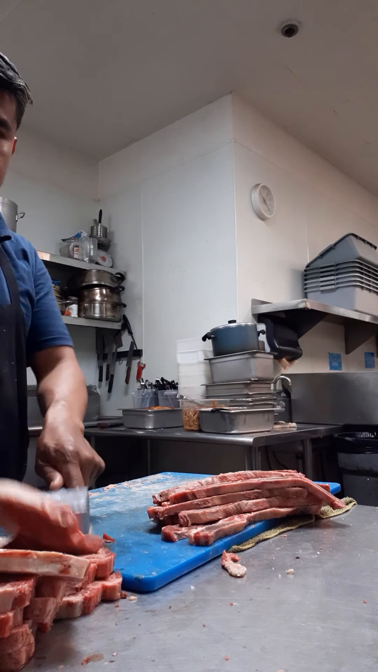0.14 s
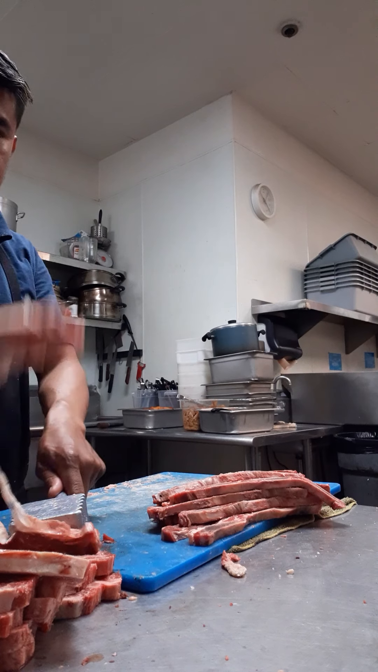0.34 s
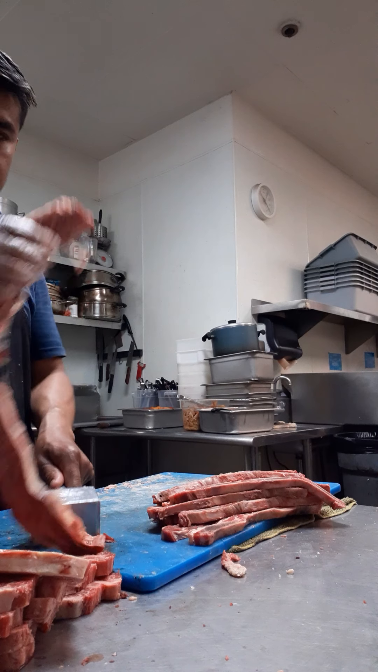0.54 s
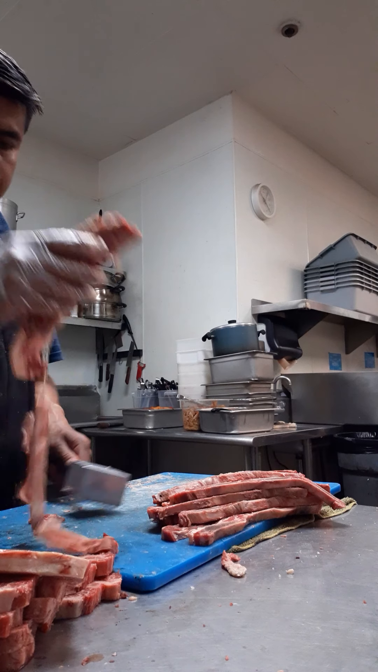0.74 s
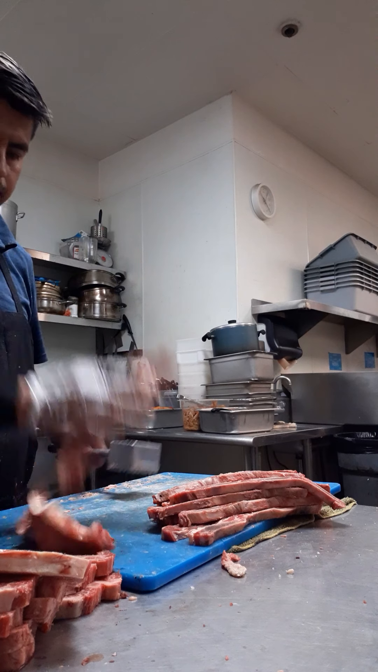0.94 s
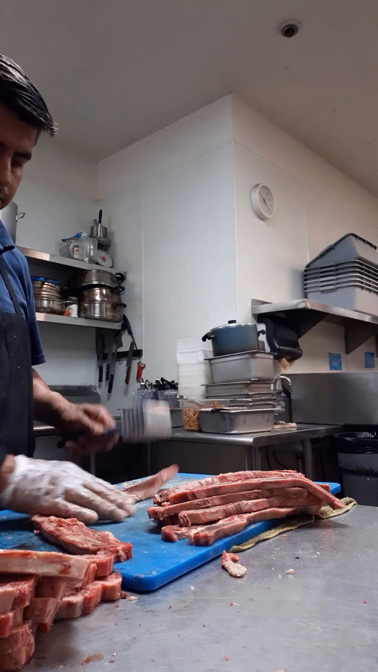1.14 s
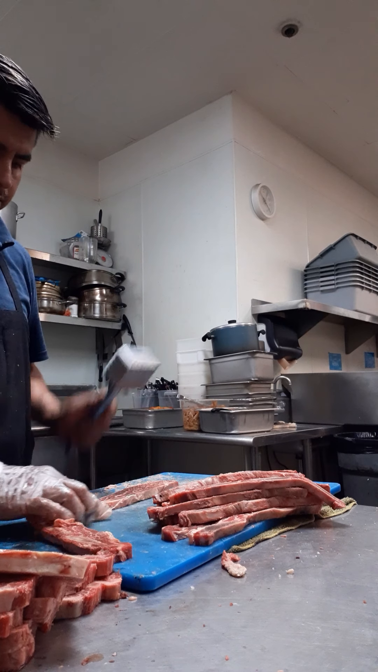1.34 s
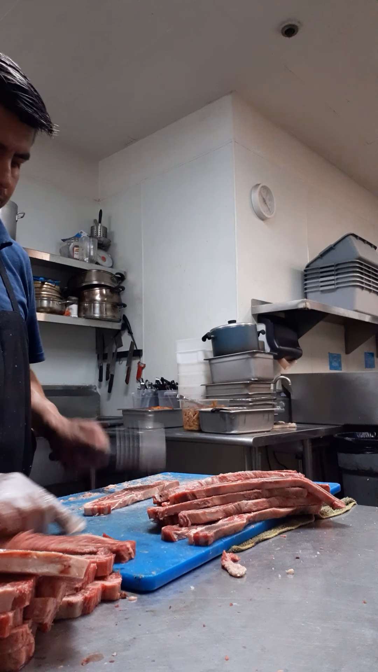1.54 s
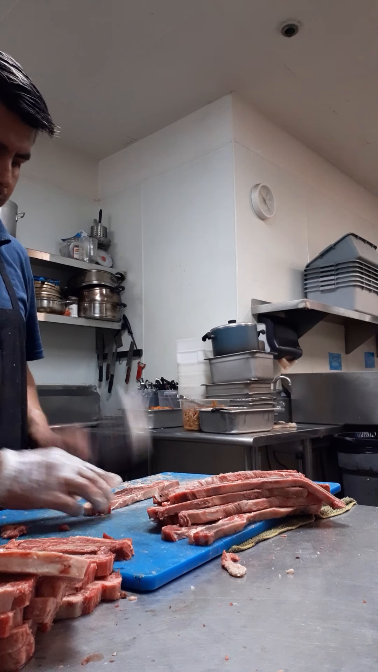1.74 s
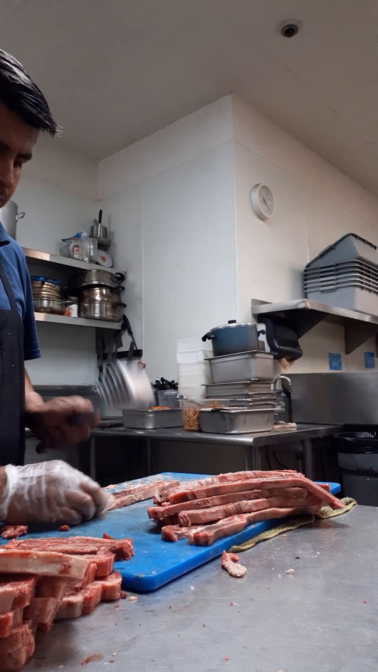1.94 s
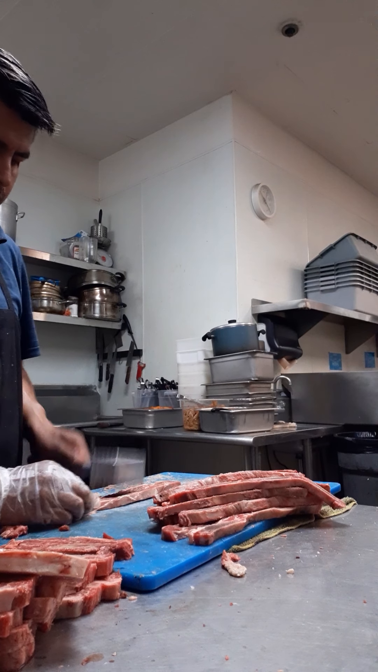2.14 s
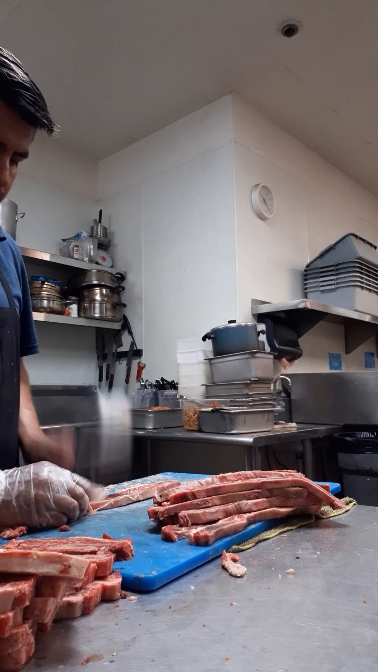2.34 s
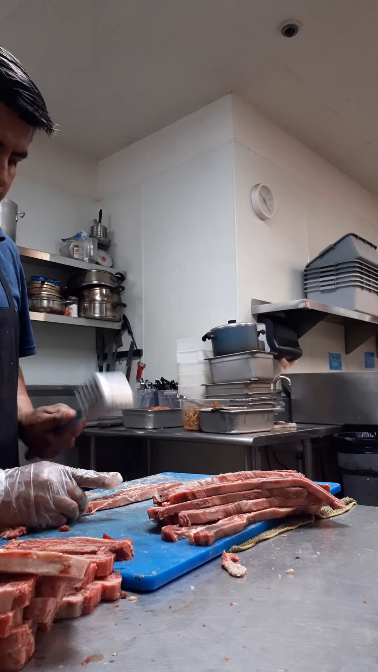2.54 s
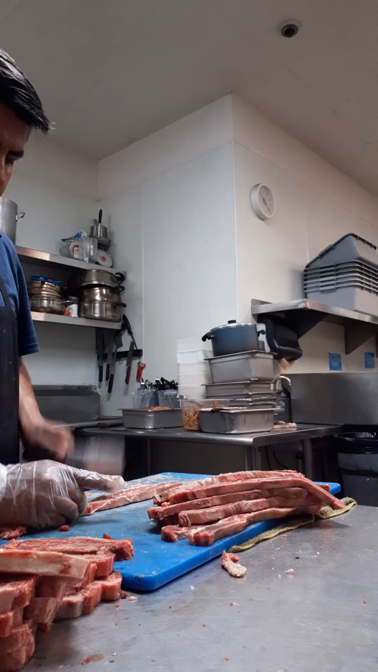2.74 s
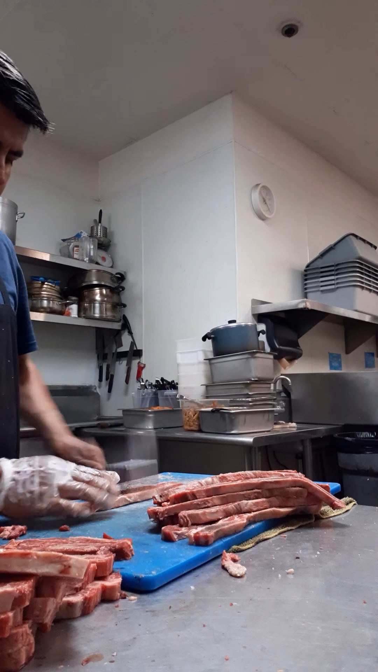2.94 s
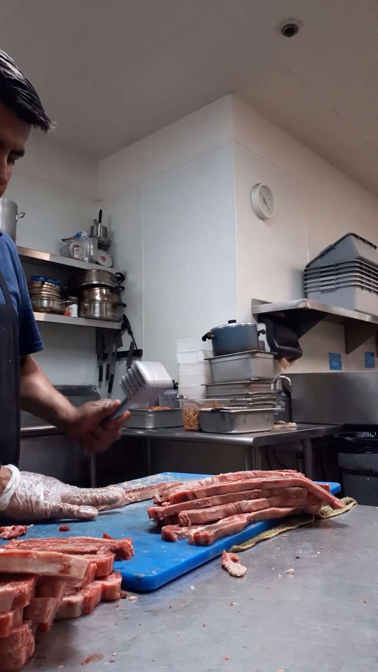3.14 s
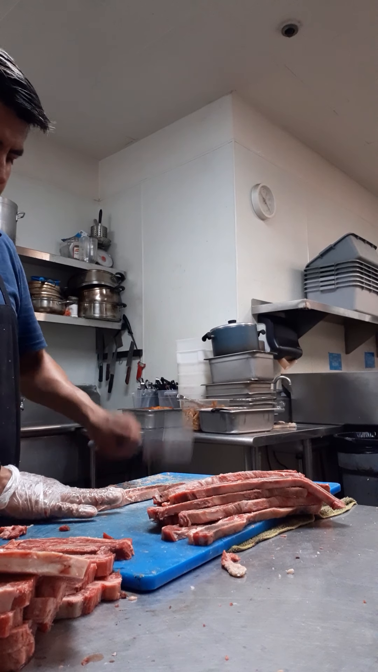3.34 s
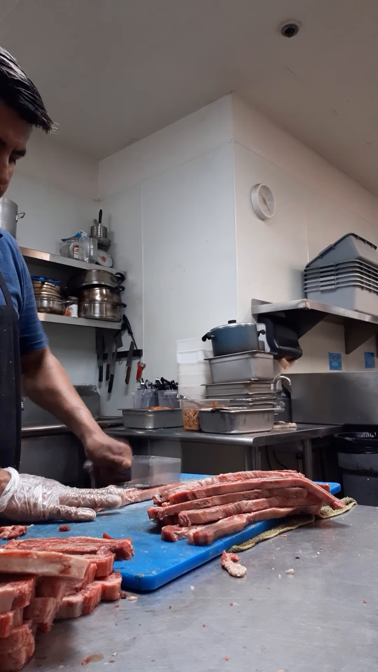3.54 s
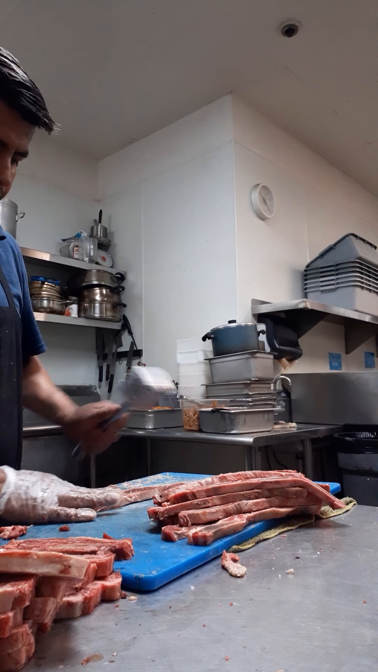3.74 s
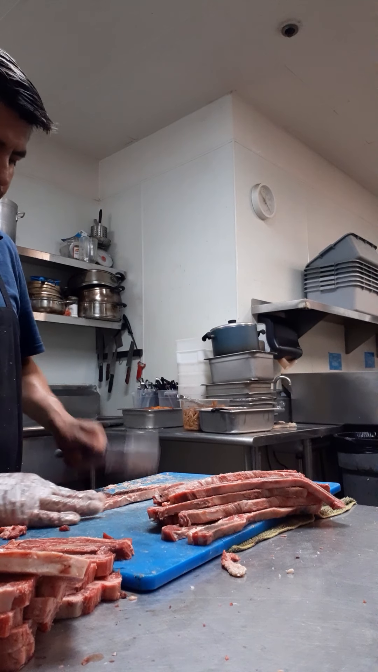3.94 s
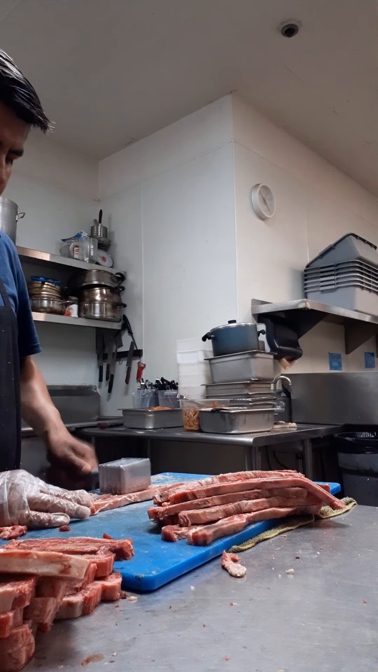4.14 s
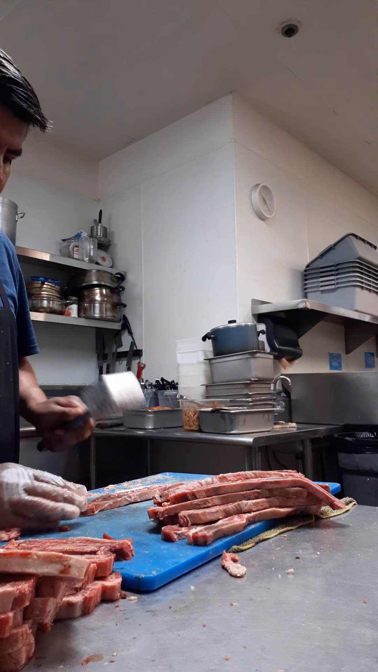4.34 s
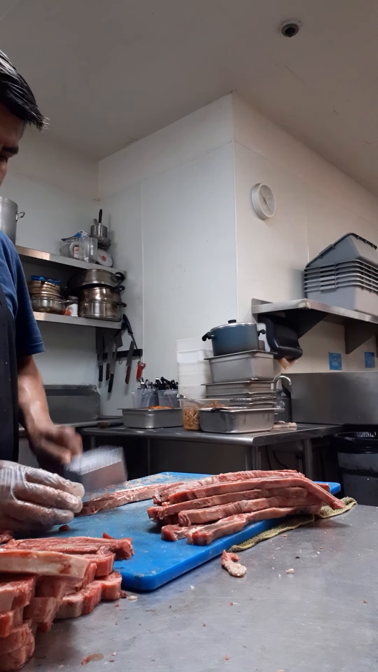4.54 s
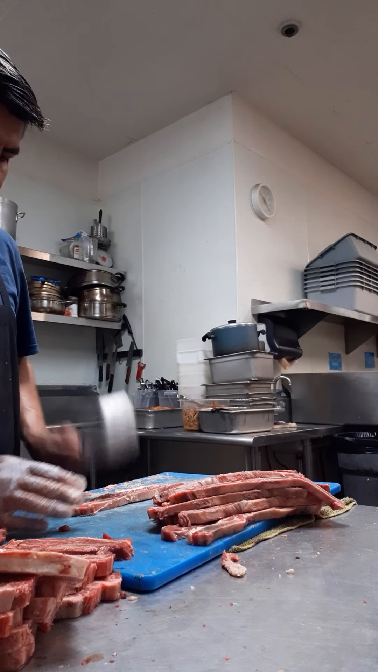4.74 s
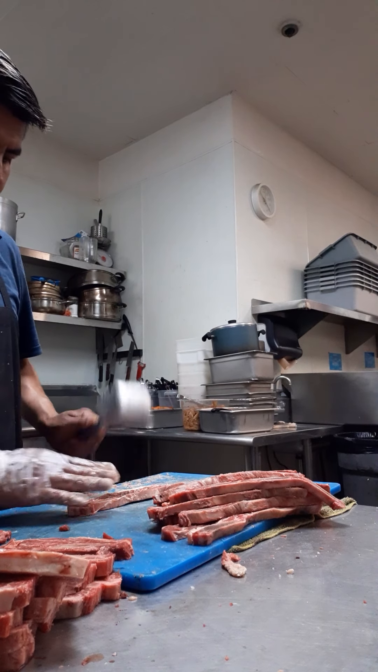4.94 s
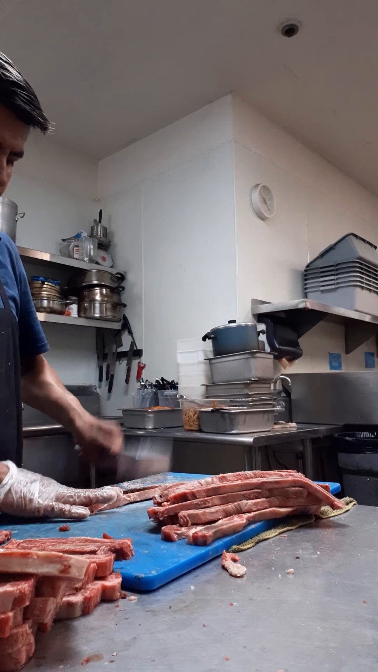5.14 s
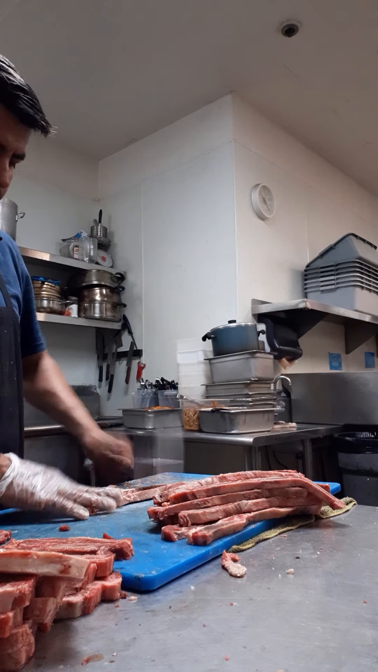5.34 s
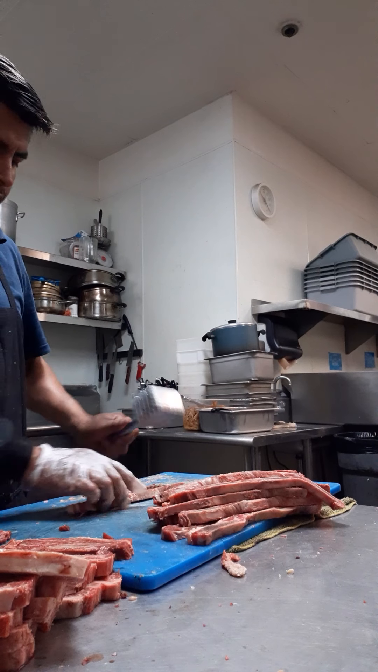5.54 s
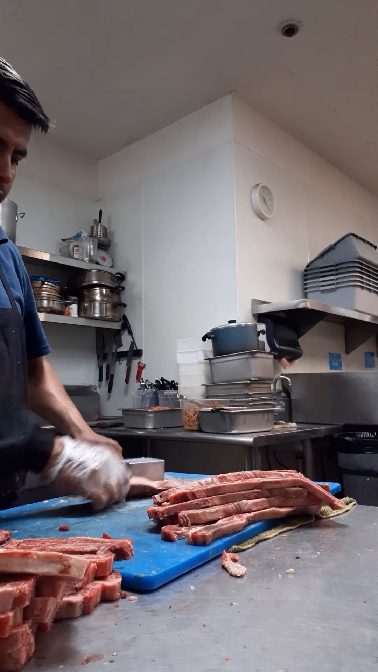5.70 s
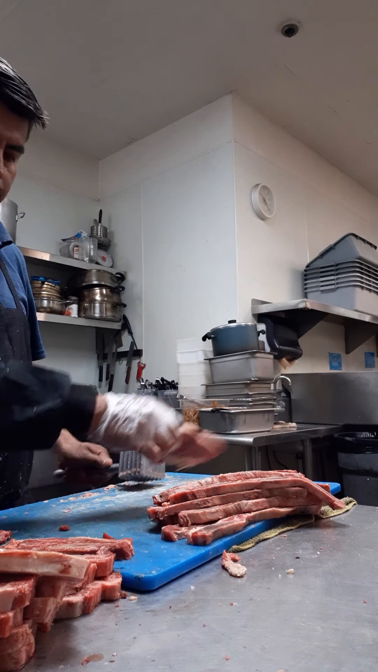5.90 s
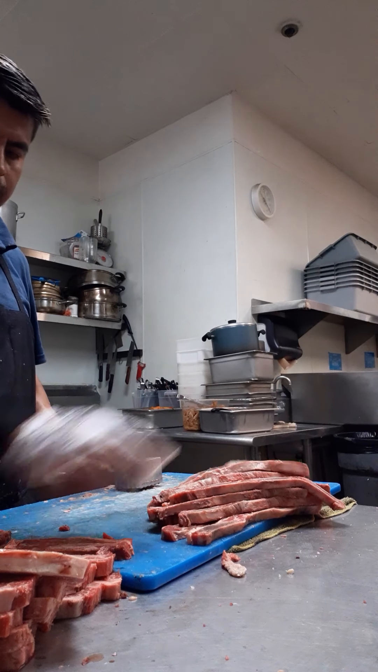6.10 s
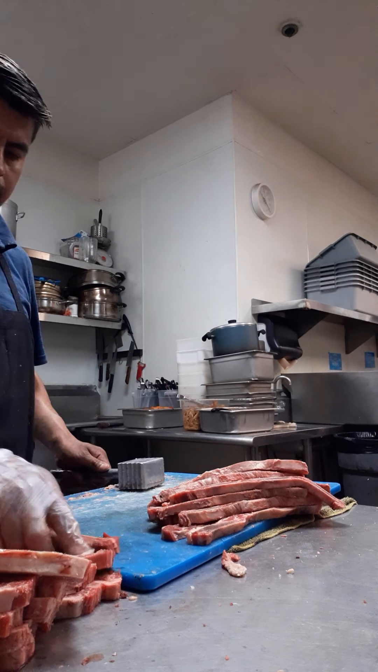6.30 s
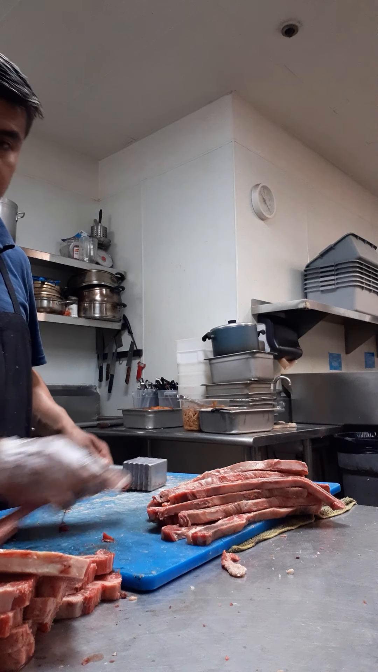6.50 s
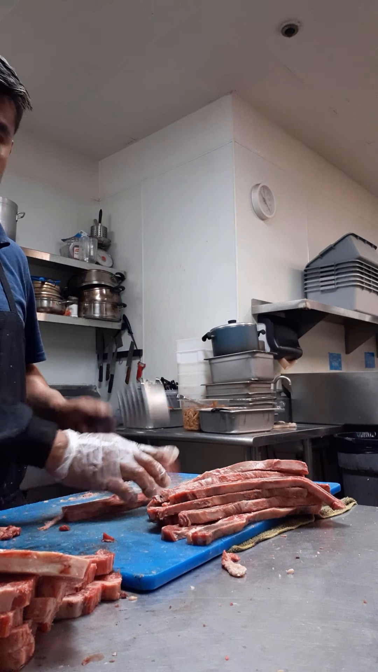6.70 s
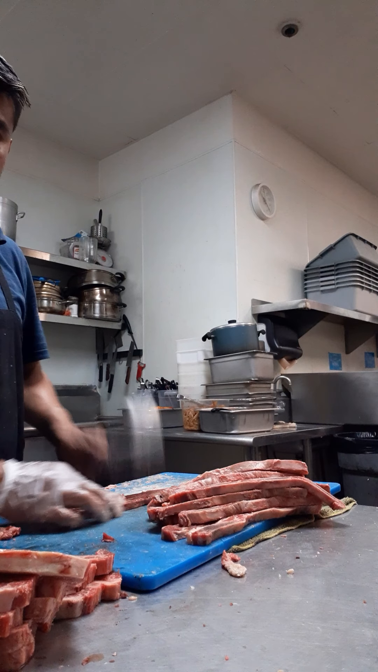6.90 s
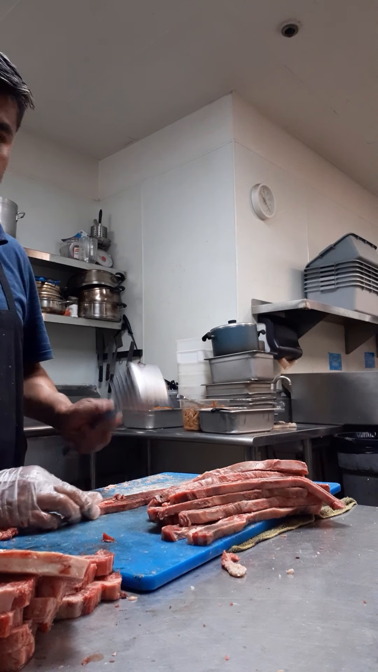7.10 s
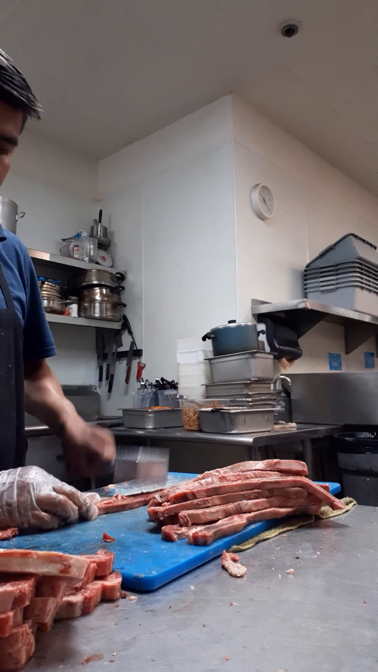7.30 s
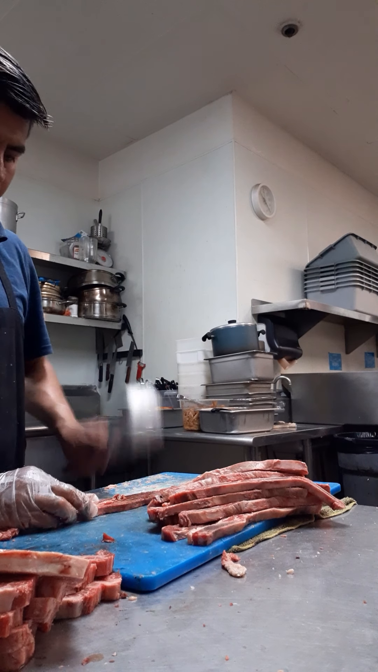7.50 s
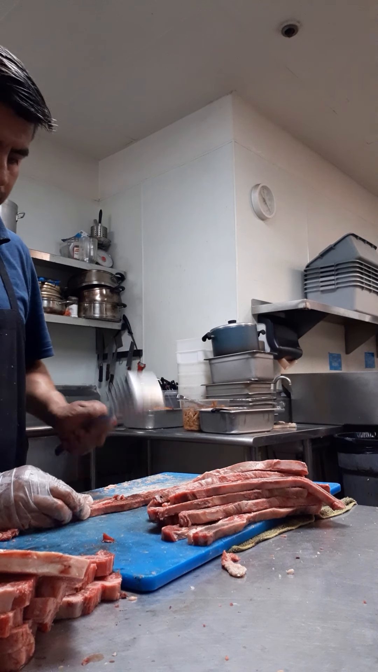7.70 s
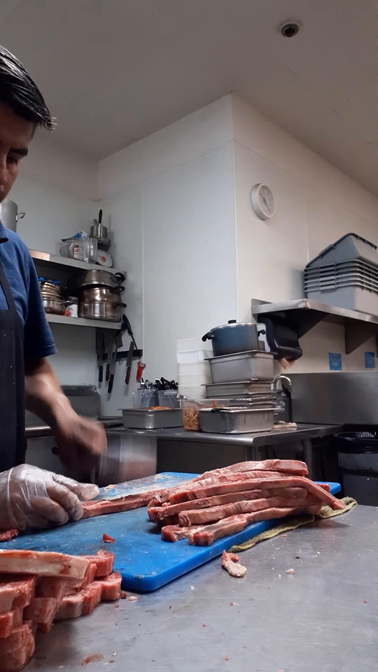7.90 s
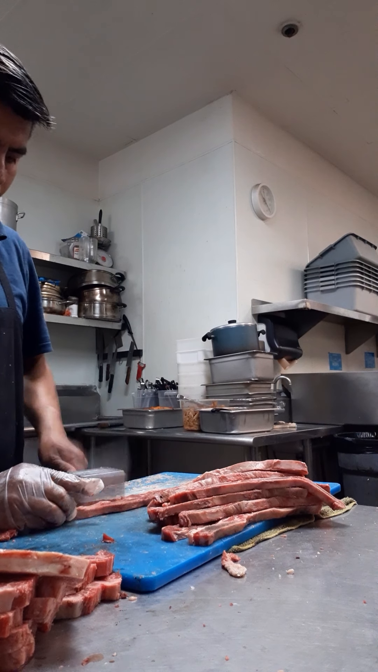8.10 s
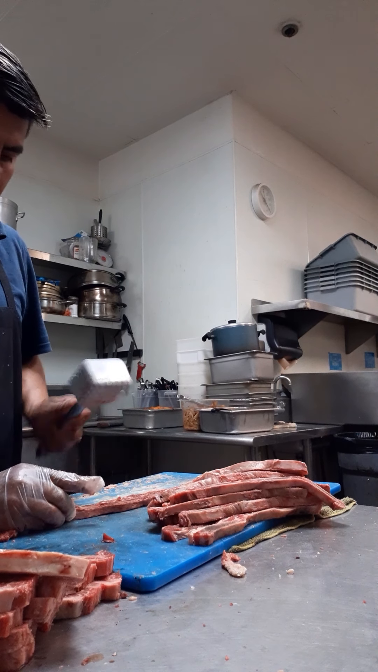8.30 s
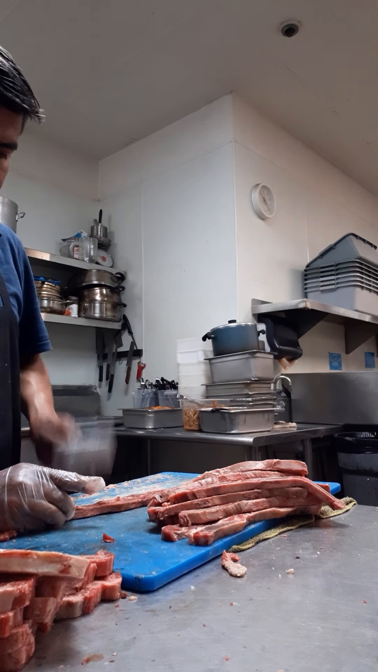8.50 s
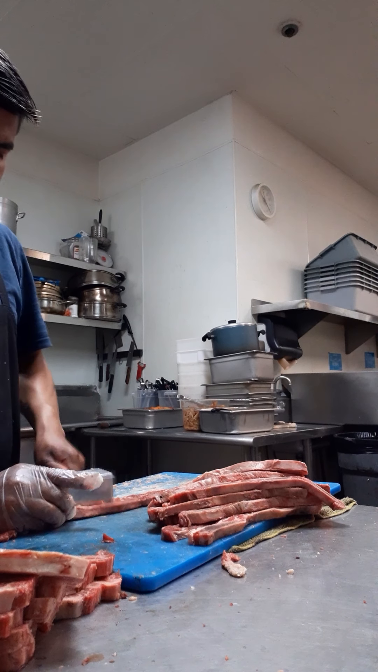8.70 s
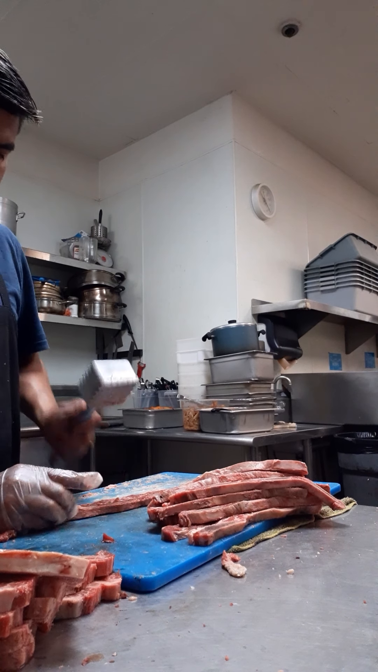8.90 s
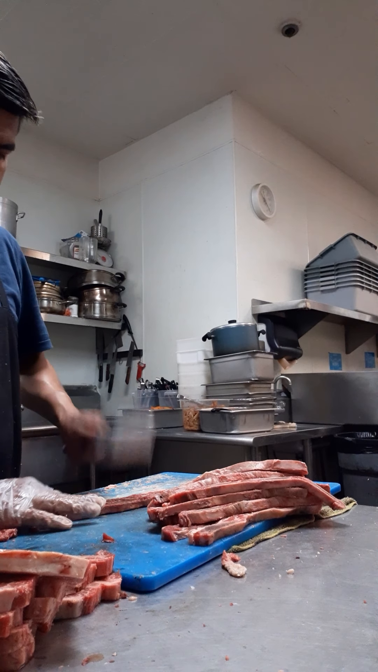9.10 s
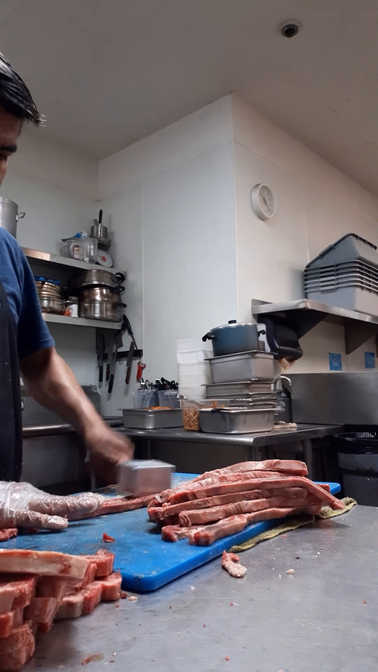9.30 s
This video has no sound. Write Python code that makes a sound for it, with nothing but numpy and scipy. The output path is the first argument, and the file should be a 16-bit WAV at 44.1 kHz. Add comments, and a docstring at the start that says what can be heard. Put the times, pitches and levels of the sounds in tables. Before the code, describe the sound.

In a small kitchen with a steady low machine hum, a metal mallet beats raw meat close by. After a few light handling knocks comes a run of quick, even blows, wet and thudding, rattling the plastic board and the steel table under it. The beating stops for about a second, with faint sticky sounds of meat leaving a glove, then a second, shorter run follows at the same pace.

```python
"""Refrigeration and ventilation hum in a small, hard-walled kitchen; meat and mallet knock on a board.
Then the metal mallet pounds the raw meat in two runs, on a plastic board that lies on a steel table.
Each blow is a wet slap and a thud; the table booms, and the board and things around it chatter briefly.
In the pause come light knocks and the sticky sound of meat leaving a glove. The hum runs throughout."""
import sys
import numpy as np
from scipy import signal
from scipy.fft import rfft, irfft, next_fast_len
from scipy.io import wavfile
from scipy.ndimage import uniform_filter1d, minimum_filter1d

SR = 44100
rng = np.random.default_rng(int(sys.argv[2]) if len(sys.argv) > 2 else 0)


def master_out(mix):
    """Clip the mix to full scale and print it as 16-bit PCM to the path in sys.argv[1]."""
    frames = np.transpose(np.atleast_2d(mix))
    ceiling = np.clip(frames, -1, 1)
    pcm = np.round(ceiling * 32767).astype(np.int16)
    wavfile.write(sys.argv[1], SR, pcm)


N = 412335
T = np.arange(16384) / SR  # time axis of one hit, in seconds

# fader curve of the compressor drone: time_s, level_db
DRONE_FADER = [(0, -37.5), (.5, -26.5), (1.45, -29.5), (2, -35), (5.9, -40), (6.2, -28.5), (6.5, -31),
               (6.7, -41), (9.35, -36)]
# fader curve of the ventilation's rush and the whines: time_s, level_db
RUSH_FADER = [(0, -37.5), (.4, -32.5), (1.4, -33), (2.8, -38.5), (9.35, -37.5)]
# tone colour of the ventilation: frequency_hz, gain_db
RUSH_EQ = [(25, -19), (60, -13), (100, -3), (160, -4.5), (215, -5.5), (400, -11.5), (600, -8.5),
           (760, -18.5), (1100, -23), (1900, -28), (3000, -37.5), (4500, -43), (9000, -48), (15500, -56)]
# steady motor tones: pitch_hz, level_db
MOTOR_TONES = [(100, -42.5), (161.5, -43.5), (296, -58), (414.5, -50), (530, -57.5), (586.8, -50),
               (647, -65), (1061, -73)]
# thin machine whines, set against the rush: pitch_hz, width_hz, level_db
MACHINE_WHINES = [(4480, 130, -32), (6620, 240, -43)]

# meat and mallet set down on the board: start_s, weight_db, clack_db, clack_pitch_hz, spit_db
BOARD_KNOCKS = [(.106, -27, -24, 1496, -50), (0.1093, -22, -17.5, 2030, -30.5),
                (.117, -21, -20.5, 1540, -38), (.121, -24, -23.5, 1040, -30.5),
                (0.2137, -24, -18, 1600, -38), (1.001, -36, -30.5, 1150, -49),
                (1.0717, -24, -11, 1904, -50), (1.2237, -35, -22, 2230, -46),
                (1.622, -31, -32.5, 1920, -59), (6.565, -46, -40, 1520, -62), (6.7755, -45, -28, 1510, -44)]
# hard clack on plastic: frequency_hz, gain_db
CLACK_EQ = [(200, -11), (550, -2), (950, 1), (1400, -1), (1900, 1), (2600, -5), (3200, -10.5), (4300, -9),
            (7000, -35.5), (15000, -62)]
# spurt of juice: frequency_hz, gain_db
SPIT_EQ = [(1000, -28), (3000, -20), (4600, 7), (7500, 0.5), (9500, 4.5), (11200, 5), (13000, -5),
           (16000, -19)]
# modes of the steel table: pitch_hz, level_db, t60_s
TABLE_MODES = [(52.4, -15.5, 0.16), (72.2, -20.5, 0.68), (83.7, 0.5, 0.22), (93.5, -4, 0.29),
               (115.45, -2.5, 0.33), (161.4, -8, 0.54), (228.3, -9, 0.26), (238.4, -14, 0.43),
               (302.6, -10, 0.39), (323.8, -8.5, 0.26), (428, -16.5, 0.3), (457.6, -14.5, 0.47),
               (512, -22, 0.11), (618, -27, 0.22), (762, -20, 0.31), (850, -32, 0.16)]
# clatter of board and table: frequency_hz, gain_db
CLATTER_EQ = [(40, -23), (90, -6), (220, -4.5), (360, -2), (470, -0.5), (600, 0.5), (780, -3.5),
              (1100, -10), (1600, -16), (2800, -24), (5000, -33.5), (15000, -53)]
# ring of the steelware nearby: frequency_hz, gain_db
STEELWARE_EQ = [(700, -24), (1300, -4), (1950, 0), (2600, -3), (3200, -16), (5000, -14), (12000, -46)]
# wet meat and glove rustling: start_s, length_s, level_db
MEAT_RUSTLES = [(0.163, 0.25, -55), (0.426, .088, -54), (0.992, 0.051, -56), (6.19, 0.15, -65)]
# tone colour of that rustle: frequency_hz, gain_db
RUSTLE_EQ = [(2000, -24), (4000, -2), (7000, -9), (9500, 1), (14000, -2), (16000, -8)]

# mallet blows: start_s, thud_db, slap_db, slap_pitch_hz, spit_db
MALLET_BLOWS = [(1.49, -12, -24, 1390, -20.5), (1.8212, -11.5, -23, 1310, -30.5),
                (2.121, -9.5, -16, 1560, -29), (2.415, -10, -21, 2210, -31), (2.6958, -8.5, -28, 2220, -42),
                (2.9948, -11, -27.5, 1520, -32), (3.2806, -8.7, -20, 3900, -36),
                (3.5842, -9, -22.5, 1270, -40), (3.882, -8, -21.5, 1520, -26), (4.176, -8, -28, 1540, -28),
                (4.5163, -9.5, -18, 2120, -44), (4.823, -8.5, -24, 1510, -38),
                (5.104, -8, -22.5, 1490, -28), (5.397, -6.5, -23.5, 1660, -35),
                (5.6749, -7, -26, 4270, -36), (6.9788, -17, -13.5, 1390, -31), (7.29, -15, -13, 1900, -25),
                (7.5894, -30, -39, 1380, -43), (7.8666, -11.5, -27, 3380, -30),
                (8.1545, -10, -34, 1980, -39), (8.4507, -14.5, -24.5, 2100, -30),
                (8.7443, -11.5, -28, 2440, -28.5), (9.034, -9.5, -18, 1230, -29),
                (9.327, -12.5, -19.5, 1950, -31)]
# cuts of meat, the softer one thudding lower: laid_down_s, thud_pitch_hz, boom_db, rattle_db
MEAT_CUTS = [(1.2, 236, -17.5, -26), (6.8, 215.2, -16.5, -25)]
# slap of metal on meat: frequency_hz, gain_db
SLAP_EQ = [(150, -15), (500, 0), (1100, -3), (1700, -2), (2600, -4), (4500, -9), (7000, -20), (11000, -32),
           (16000, -52)]
# hops of the board after a blow: delay_s, level_db
BOARD_HOPS = [(.007, -3.5), (.014, 3), (0.021, -8), (.030, 3), (.039, 1), (.049, -2.5), (.059, -4.5),
              (0.067, -7)]
# wet rattle of those hops: frequency_hz, gain_db
RATTLE_EQ = [(300, -7.5), (900, 6), (1700, 0.5), (3000, -5.5), (5000, -2), (7400, -13), (9200, -8),
             (11000, -12), (13500, -17), (16000, -38)]
# faint metallic ring at every blow: pitch_hz, level_db
METAL_MODES = [(1953, -1), (2655, 1), (3774, -8), (4635, -12), (5380, -14), (6057, -8), (7532, -17),
               (8839, -11), (9346, -12)]
# sticky meat lets go of the glove: start_s, pitch_hz, level_db
GLOVE_SMACKS = [(6.062, 3770, -48), (6.216, 4800, -48), (6.256, 5300, -51), (6.476, 5300, -56),
                (6.554, 5500, -49)]

# decay of the kitchen reverb: frequency_hz, t60_s
REVERB_DECAY = [(80, 0.5), (250, 0.56), (600, 0.32), (2000, 0.56), (5000, 0.54), (9000, 0.16), (15000, 0.5)]
# tone colour of the kitchen reverb: frequency_hz, gain_db
REVERB_EQ = [(60, -32), (250, -2.5), (600, -7.5), (2000, -11), (5000, -17.5), (9000, -12), (15000, -22)]
# how alike left and right are in diffuse sound: frequency_hz, correlation
STEREO_LIKENESS = [(30, 0.47), (100, 0.54), (300, 0.98), (650, 0.46), (1400, -0.4), (2500, 0.11),
                   (5000, -0.016)]

USUAL_THUD_DB, FOLLOW_DB_PER_DB = -11, 0.12  # board and table follow a blow's force above or below this
THUD_OCTAVES_PER_DB = 0.0249  # the thud's pitch rises a little with force
# a slap louder than its thud plus BONE_DB has met bone: higher thud, less shake, more steelware
BONE_DB, BONE_OCTAVES_PER_DB, BONE_LOSS_DB_PER_DB = -5, .18, 0.98
FLATTEN_DB_PER_S = 1.05  # the wet rattle dies down as a cut is beaten flat
EARLIEST_LANDING_S, LATEST_LANDING_S = .013, 0.0433  # the board's hardest landing falls between these
CLATTER_DB, METAL_DB = -15.5, -41.5  # at a usual blow
STEEL_VS_SLAP_DB, STEEL_VS_CLACK_DB, BOOM_VS_WEIGHT_DB = -22, -21, -2.5


def amp(db):
    """Decibels to gain."""
    return 10 ** (np.asarray(db) / 20)


def read(points, hz):
    """Reads a table on a log-frequency axis."""
    f, value = np.transpose(points)
    return np.interp(np.log(hz + 1), np.log(f + 1), value)


def unit(x, span_s=None):
    """Scales to rms 1, or to the energy that rms 1 has over span_s."""
    power = np.mean(x ** 2) * (x.shape[-1] / (span_s * SR) if span_s else 1)
    return x / np.sqrt(power + 1e-20)


def add(mix, start_s, sound):
    """Lays a stereo sound into the mix."""
    part = mix[:, max(round(start_s * SR), 0):][:, :sound.shape[-1]]
    part += sound[..., :part.shape[-1]]


def eq(x, curve):
    """Minimum-phase equaliser, so attacks stay sharp."""
    size = next_fast_len(x.shape[-1] + 4096)
    log_gain = np.log(amp(read(curve, abs(np.fft.fftfreq(size, 1 / SR)))))
    response = np.exp(np.conj(signal.hilbert(log_gain)))[:size // 2 + 1]
    return irfft(rfft(x, size) * response, size)[..., :x.shape[-1]]


def diffuse(size):
    """Stereo noise arriving from all sides."""
    a, b = rfft(rng.standard_normal((2, size)))
    same = np.clip(read(STEREO_LIKENESS, np.fft.rfftfreq(size, 1 / SR)), -1, 1)
    return irfft(np.array([a, same * a + np.sqrt(1 - same ** 2) * b]), size)


def direct(x, pan_db, lag_s=14 / SR):
    """Sound straight from the board reaches the left side later and weaker."""
    return np.array([amp(-pan_db / 2) * np.interp(T - lag_s, T, x, left=0), amp(pan_db / 2) * x])


def pan(x, pan_db):
    """Leans a stereo sound to the right, at rms 1."""
    return unit(x * amp([[-pan_db / 2], [pan_db / 2]]))


def wavering_tone(hz, width_hz):
    """Noise in one narrow, steep-sided resonance."""
    f = np.fft.rfftfreq(N, 1 / SR)
    return unit(irfft(rfft(rng.standard_normal(N)) / (1 + (2 * (f - hz) / width_hz) ** 2) ** 2, N))


def machines():
    """The bed: a throbbing compressor drone, motor tones, thin whines and the rush of ventilation."""
    t = np.arange(N) / SR
    drone_gain = amp(np.interp(t, *np.transpose(DRONE_FADER)))
    rush_gain = amp(np.interp(t, *np.transpose(RUSH_FADER)))
    rush = unit(eq(diffuse(N), RUSH_EQ))
    motors = sum(amp(db) * wavering_tone(hz, width_hz=6.9) for hz, db in MOTOR_TONES)
    whine = sum(amp(db) * np.array([wavering_tone(hz, width), wavering_tone(hz, width)])
                for hz, width, db in MACHINE_WHINES)
    throb = signal.hilbert(wavering_tone(hz=130.6, width_hz=19.6))
    throb = unit(throb.real / np.sqrt(abs(throb) + 1e-6))  # the drone wavers but seldom drops out
    return rush_gain * (rush + whine) + drone_gain * throb + motors


def crack(decay_s, tick=2.4):
    """First contact: a sharp tick and a few milliseconds of hiss."""
    hiss = rng.standard_normal((2, len(T))) * np.exp(-T / decay_s)
    hiss[:, 0] += tick
    return unit(hiss)


def scatter(fall_s):
    """Quick reflections from table top and shelves."""
    return unit(diffuse(len(T)) * (1 - np.exp(-T / 0.0012)) * np.exp(-T / fall_s))


def impact(hz, curve, decay_s, ring_s, pan_db, scatter_db, pop_db=-1.5):
    """A clack on plastic or a slap on meat: a crack with a quickly damped pop, then their scatter."""
    pop = np.sin(2 * np.pi * hz * T) * np.exp(-T / ring_s)
    attack = pan(unit(eq(crack(decay_s), curve)) + amp(pop_db) * unit(pop), pan_db)
    reflections = unit(eq(scatter(fall_s=0.019), curve))
    return unit(attack + amp(scatter_db) * reflections, 0.0065)


def spit(scatter_db=-9):
    """Juice squeezed out of the meat: a very bright spurt."""
    spurt = crack(decay_s=0.0022) + amp(scatter_db) * scatter(fall_s=0.034)
    return unit(eq(spurt, SPIT_EQ), 0.0068)


def table_boom(polarity, rise_s=0.014):
    """The table's modes swell as the hit spreads through the steel sheet."""
    hz, db, t60 = np.transpose(TABLE_MODES)[:, :, None]
    strength = polarity * amp(db + 1.13 * rng.standard_normal(hz.shape))
    ring = (strength * amp(-60 * T / t60) * np.sin(2 * np.pi * hz * T)).sum(0)
    return direct(unit(ring * (1 - np.exp(-(T / rise_s) ** 2)), 0.083), pan_db=2.5)


def clatter(body, hold_s, fall_s, swell_db=0, swell_s=0.044, swell_width_s=0.011):
    """Dense resonances of board and table; swell_db lifts them as the board drops back."""
    alike, straight = 0.37, 0.29  # shares of power: common to all hits, and arriving directly
    ring = np.sqrt(alike) * body + np.sqrt(1 - alike) * diffuse(len(T))
    near = direct(rng.standard_normal(len(T)), pan_db=2.5)
    ring = np.sqrt(1 - straight) * ring + np.sqrt(straight) * near
    envelope = (1 - np.exp(-T / 0.00079)) * np.exp(-np.maximum(T - hold_s, 0) / fall_s)
    swell = amp(swell_db * np.exp(-((T - swell_s) / swell_width_s) ** 2))
    return unit(pan(eq(ring * envelope * swell, CLATTER_EQ), pan_db=3.0), 0.085)


def steelware(rise_s, t60_s=0.68):
    """Hard contact leaves pans and shelves ringing, many close modes together."""
    return unit(eq(diffuse(len(T)), STEELWARE_EQ)) * (1 - np.exp(-T / rise_s)) * amp(-60 * T / t60_s)


def knocking(polarity, body):
    """Meat and mallet set down: light, hard knocks, too weak to make the board hop."""
    air, table = np.zeros((2, 2, N))
    for s, weight_db, clack_db, clack_hz, spit_db in BOARD_KNOCKS:
        boom = amp(BOOM_VS_WEIGHT_DB) * table_boom(polarity)
        add(table, s, amp(weight_db) * (boom + clatter(body, hold_s=0.004, fall_s=0.028)))
        add(table, s, amp(clack_db + STEEL_VS_CLACK_DB) * steelware(rise_s=.003))
        clack = impact(clack_hz, CLACK_EQ, decay_s=0.0025, ring_s=.0013, pan_db=3.5, scatter_db=-1.5)
        add(air, s, amp(clack_db) * clack)
        add(air, s, amp(spit_db) * spit())
    return air, table


def meat_rustle(flicker_db=2.2):
    """Sticky meat peels from board and glove in fine crackles."""
    out = np.zeros((2, N))
    for s, length_s, db in MEAT_RUSTLES:
        size = int(length_s * SR)
        noise = diffuse(size)
        flicker = amp(flicker_db * unit(uniform_filter1d(rng.standard_normal(size), size=90)))
        add(out, s, amp(db) * unit(eq(noise * flicker * np.hanning(size), RUSTLE_EQ)))
    return out


def thud(hz, rise_s=0.0045, octave_db=-17):
    """The mallet head sinks into the meat and pushes the board through a few damped swings."""
    swing = np.sin(2 * np.pi * hz * T) + amp(octave_db) * np.sin(4 * np.pi * hz * T)
    push = unit(swing * T / rise_s * np.exp(-T / rise_s), 0.012)
    return direct(push, pan_db=1.5)


def wet_rattle(hardest_s, hardest_db=3, jitter_s=0.0024, spread_db=-2.0, rise_s=0.0021, bed_db=-13):
    """Each hop of the board lands as a dense cluster of small wet clicks."""
    power = amp(2 * bed_db) * np.exp(-(T / 0.06) ** 4)
    delay_s, db = np.transpose(BOARD_HOPS)
    late, soft = rng.uniform(-0.69, 1, (2, len(BOARD_HOPS)))
    hops = zip(delay_s + jitter_s * late, db + spread_db * soft)
    for start_s, level_db in [(hardest_s - rise_s, hardest_db), *hops]:
        age = np.maximum(T - start_s, 0) / rise_s
        power = power + (amp(level_db) * age * np.exp(1 - age)) ** 2
    grains = amp(np.repeat(rng.uniform(-7, 7, len(T) // 32), 32))  # a new level every 32 samples
    clicks = diffuse(len(T)) + .5 * direct(rng.standard_normal(len(T)), pan_db=3.5)
    return unit(pan(eq(clicks * grains * np.sqrt(power), RATTLE_EQ), pan_db=0.5), 0.085)


def metal_ring(rise_s=.015, t60_s=0.21):
    """High steel modes build up while the board chatters, in a new phase for each blow and side."""
    hz, db = np.transpose(METAL_MODES)[:, :, None]
    phase = rng.random((2, len(METAL_MODES), 1))
    ring = (amp(db) * np.sin(2 * np.pi * (hz * T + phase))).sum(1)
    return unit(ring * (1 - np.exp(-T / rise_s)) * amp(-60 * T / t60_s), 0.088)


def pounding(polarity, body):
    """Mallet blows: slap and spit go into the air; thud, boom, clatter and rattle through the table."""
    air, table = np.zeros((2, 2, N))
    landings = rng.uniform(EARLIEST_LANDING_S, LATEST_LANDING_S, len(MALLET_BLOWS))
    for (s, thud_db, slap_db, slap_hz, spit_db), landing_s in zip(MALLET_BLOWS, landings):
        laid_s, cut_hz, boom_db, rattle_db = [cut for cut in MEAT_CUTS if cut[0] < s][-1]
        force_db = thud_db - USUAL_THUD_DB
        hard_db = max(slap_db - thud_db - BONE_DB, 0)
        thud_hz = cut_hz * 2 ** (THUD_OCTAVES_PER_DB * force_db + BONE_OCTAVES_PER_DB * hard_db)
        boom = amp(boom_db) * table_boom(polarity)
        rattle = amp(rattle_db - FLATTEN_DB_PER_S * (s - laid_s)) * wet_rattle(landing_s)
        shake = amp(-BONE_LOSS_DB_PER_DB * hard_db) * (boom + rattle)
        chatter = amp(CLATTER_DB) * clatter(body, hold_s=0.056, fall_s=0.025, swell_db=2.5)
        chatter += amp(METAL_DB) * metal_ring()
        add(air, s - .0005, amp(spit_db) * spit())
        slap = impact(slap_hz, SLAP_EQ, decay_s=0.0031, ring_s=0.0021, pan_db=5.5, scatter_db=-2.5)
        add(air, s, amp(slap_db) * slap)
        add(table, s, amp(thud_db) * thud(thud_hz))
        add(table, s, amp(slap_db + STEEL_VS_SLAP_DB + hard_db) * steelware(rise_s=0.013))
        add(table, s, amp(FOLLOW_DB_PER_DB * force_db) * (chatter + shake))
    return air, table


def glove_smacks(rise_s=0.0028, fall_s=0.015, width_hz=900):
    """Meat lets go of the glove in small wet smacks, each a puff in one broad resonance."""
    out = np.zeros((2, N))
    for s, hz, db in GLOVE_SMACKS:
        puff = unit(signal.lfilter(*signal.iirpeak(hz, hz / width_hz, fs=SR), diffuse(len(T))))
        add(out, s, amp(db) * puff * (1 - np.exp(-T / rise_s)) * np.exp(-T / fall_s))
    return out


def kitchen_reverb(send, build_s=0.013):
    """Hard walls return a diffuse tail, fed from the right channel; each band dies at its own speed."""
    hz, t, bands = signal.stft(diffuse(SR), SR, nperseg=256)
    t60 = read(REVERB_DECAY, hz)[:, None]
    bands = bands * amp(read(REVERB_EQ, hz)[:, None] - 60 * t / t60)
    bands *= np.sqrt(2 * np.log(1000) / (t60 * SR))  # a longer decay adds no energy
    tail = signal.istft(bands, SR, nperseg=256)[1][:, :SR]
    tail *= 1 - np.exp(-np.arange(SR) / SR / build_s)
    return signal.fftconvolve(send[1:], tail, axes=1)[:, :N]


def scene(air_send_db=6, table_send_db=-1):
    """Blows and knocks share one board and table; their airborne part feeds the reverb most."""
    polarity = rng.choice([-1, 1], (len(TABLE_MODES), 1))  # which way each table mode first swings
    body = diffuse(len(T))  # the part of the clatter that all hits share
    air, table = np.add(pounding(polarity, body), knocking(polarity, body))
    reverb = kitchen_reverb(amp(air_send_db) * air + amp(table_send_db) * table)
    return air + table + reverb + machines() + meat_rustle() + glove_smacks()


def record(dry, low_cut_hz=38, ceiling=1.0, high_cut_hz=15800):
    """Master chain: a low cut, a fast limiter on the peaks, then a steep high cut."""
    dry = signal.sosfilt(signal.butter(2, low_cut_hz, "high", fs=SR, output="sos"), dry)
    needed_gain = np.minimum(1, ceiling / (abs(dry).max(0) + 1e-9))
    gain = uniform_filter1d(minimum_filter1d(needed_gain, size=130), size=130)
    high_cut = signal.firwin(511, high_cut_hz, window=("kaiser", 9), fs=SR)
    return signal.oaconvolve(dry * gain, high_cut[None], "same")


dry = scene()
out = record(dry)
master_out(out)
```